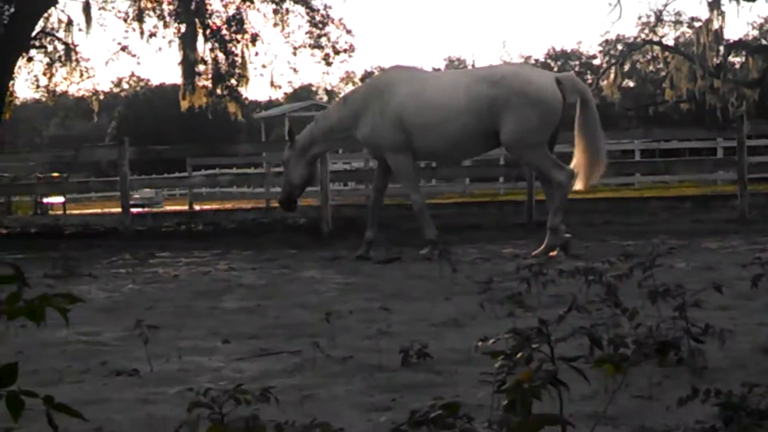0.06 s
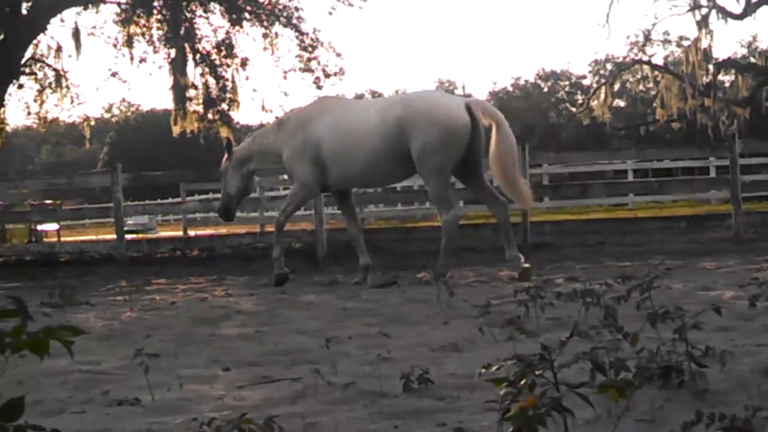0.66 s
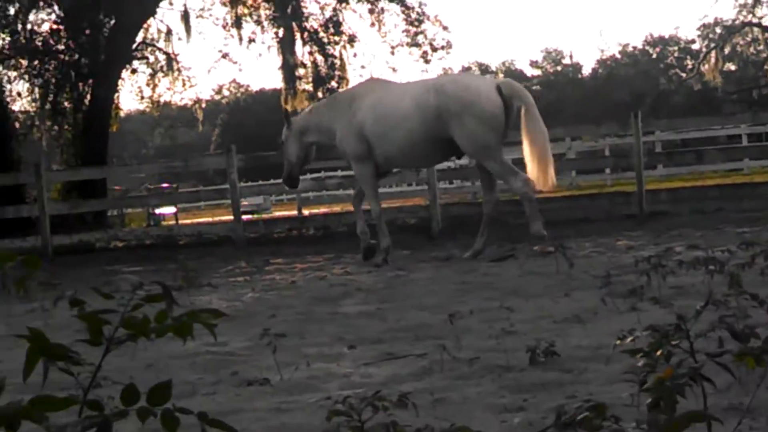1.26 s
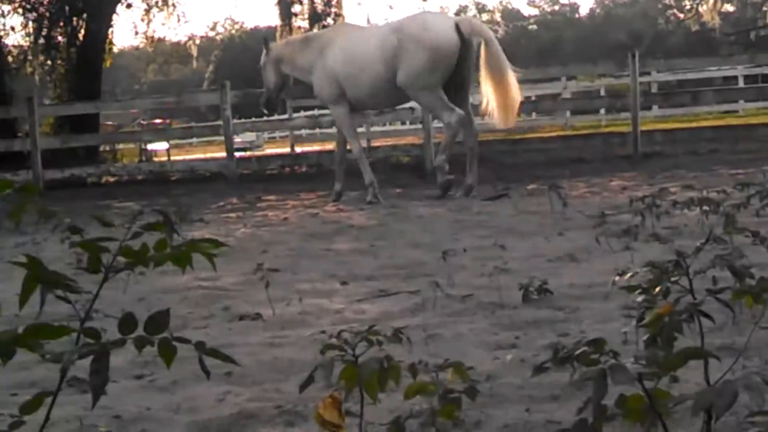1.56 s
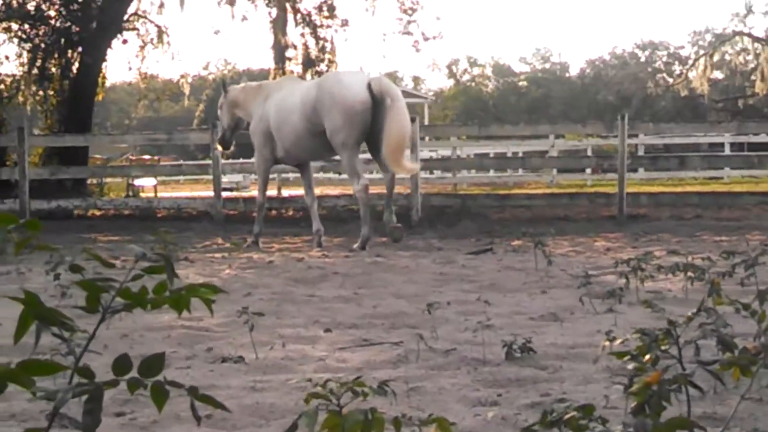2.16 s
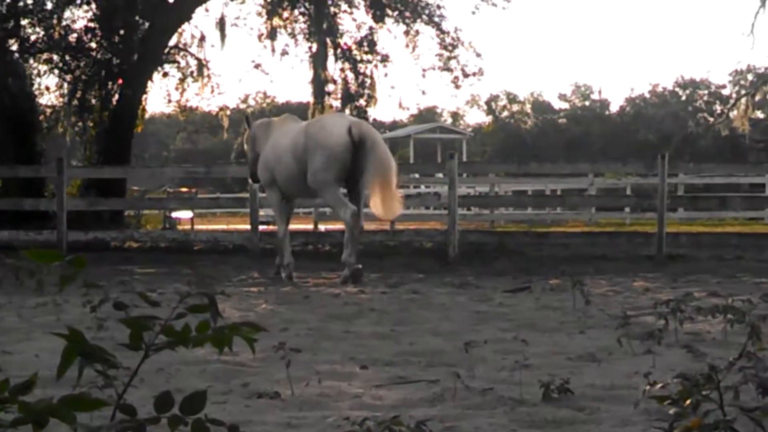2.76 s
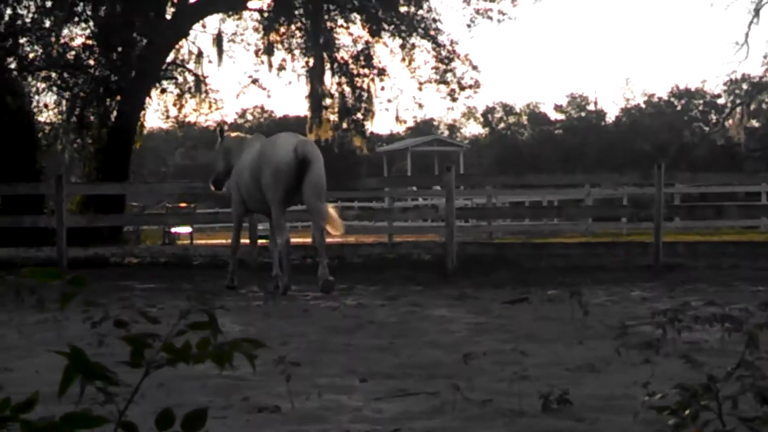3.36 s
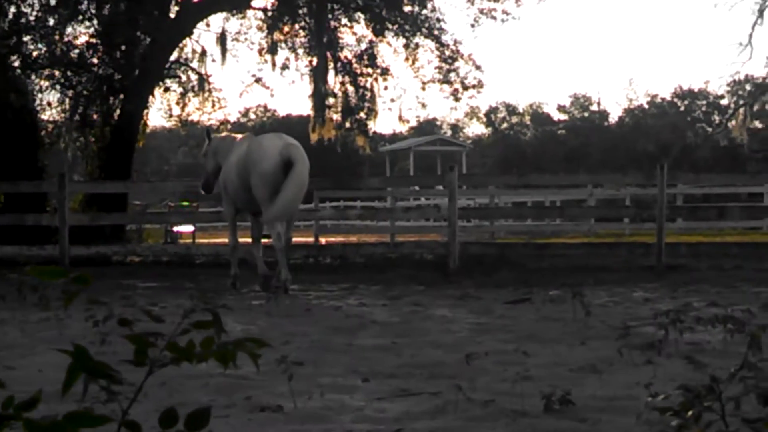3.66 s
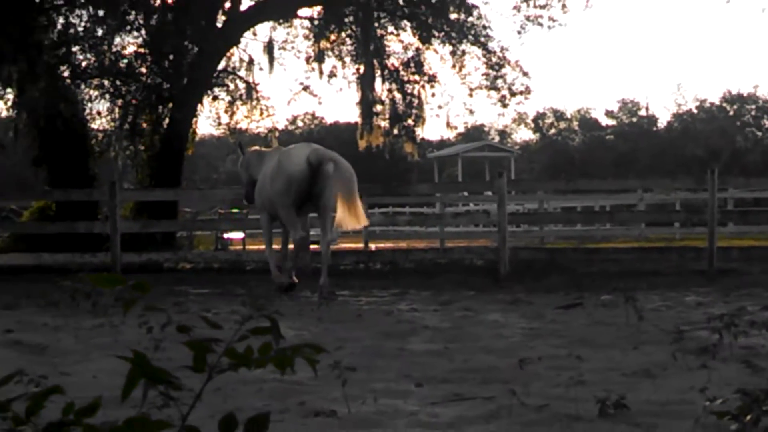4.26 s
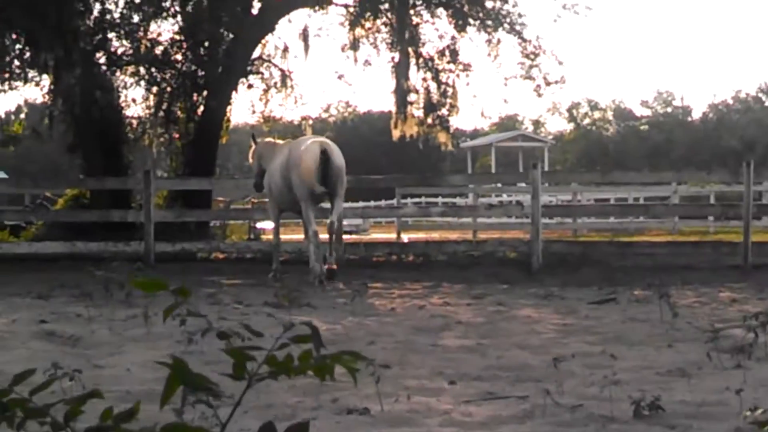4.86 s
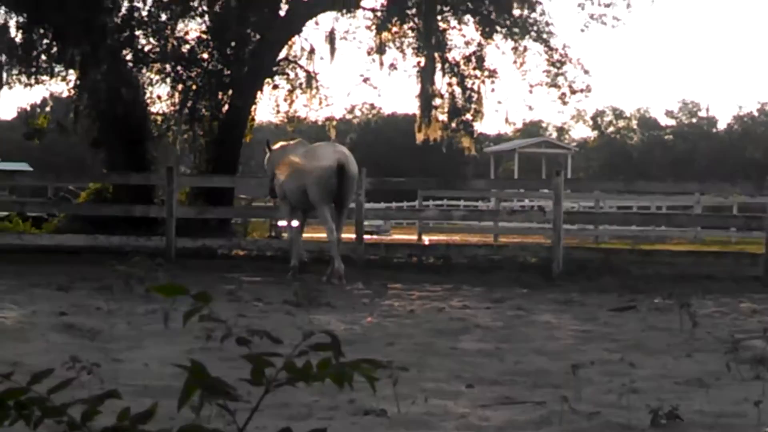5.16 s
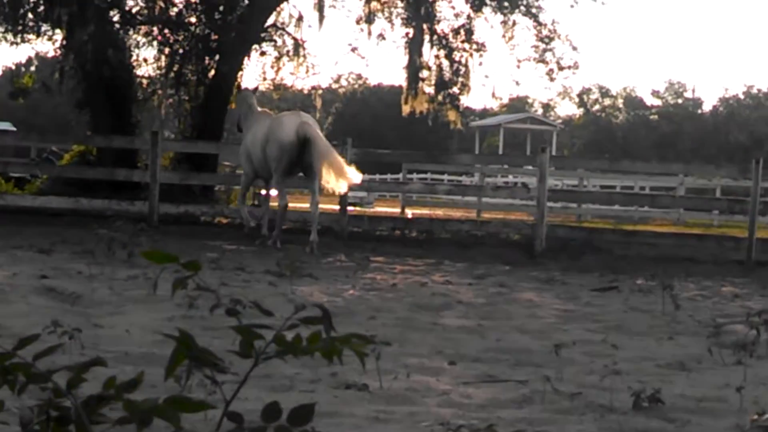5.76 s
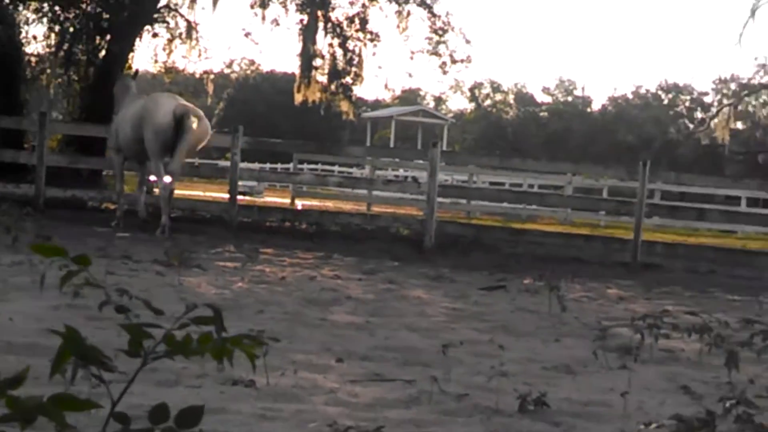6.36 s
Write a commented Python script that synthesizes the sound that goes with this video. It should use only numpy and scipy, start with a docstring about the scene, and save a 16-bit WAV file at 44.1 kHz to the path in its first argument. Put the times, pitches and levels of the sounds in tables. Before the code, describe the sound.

Beside a paddock at dusk, a near cricket chirps in a quick, even rhythm while others trill farther off, over a dull distant rush and faint hiss. Small birds whistle and chip among the trees, dry twigs snap close by, and a far knock echoes midway. Near the end leaves brush softly around the loudest snaps. The stereo sound is wide.

```python
"""Crickets at dusk beside a paddock, over a dull distant rush and a faint hiss: a near one chirps in short
bursts of wing strokes, another trills on, more ring far off. Dry twigs snap close by, among thin high
ticks and short swells of grainy high hiss. Small birds whistle and chip among the trees, soft taps sound,
a distant knock echoes and an insect buzzes once. Near the end leaves brush and a bird slurs hoarsely
downward. A camcorder's stereo widener spreads it all."""
import sys
import numpy as np
from scipy import signal
from scipy.fft import rfft, irfft
from scipy.io import wavfile
from scipy.ndimage import uniform_filter1d

SR = 44100
rng = np.random.default_rng(int(sys.argv[2]) if len(sys.argv) > 2 else 0)


def store_wav(level_fs):
    """Save 16-bit WAV to argv[1]."""
    pcm = np.round(np.clip(np.atleast_2d(level_fs), -1, 1) * 32767)
    wavfile.write(sys.argv[1], SR, pcm.T.astype(np.int16))


N = 286650
T = np.arange(N) / SR
F = np.maximum(np.arange(N // 2 + 1) * SR / N, 1)


def undb(db):
    """Decibels to gain."""
    return 10 ** (np.asarray(db) / 20)


def unit(x):
    """Scale to rms 1."""
    return x / np.sqrt(np.mean(x ** 2))


def over_pitch(rows):
    """Join (Hz, value) rows on a log-frequency axis."""
    hz, value = np.transpose(rows)
    return np.interp(np.log(F), np.log(hz), value)


def shape(x, gain):
    """Filter by a gain for each frequency."""
    return irfft(rfft(x) * gain, N)


def resonance(hz, width_hz):
    """Response of one damped resonance."""
    return 1 / (1 + 1j * (F / hz - hz / F) * hz / width_hz)


def noise_band(hz, width_hz, order):
    """Noise at rms 1 through a resonance; a higher order steepens the skirts."""
    return unit(shape(rng.standard_normal(N), resonance(hz, width_hz) ** order))


def drift(rate_hz):
    """Smooth random modulation with a spread of 1."""
    return unit(shape(rng.standard_normal(N), 1 / (1 + (F / rate_hz) ** 4)))


def phase_of(hz):
    """Running phase of a moving pitch."""
    return 2 * np.pi * np.cumsum(hz) / SR


def cycle_of(hz):
    """A ramp from 0 to 1 in each cycle of a moving rate."""
    return phase_of(hz) / (2 * np.pi) % 1


def arch(u):
    """A smooth swell while u runs from 0 to 1."""
    return np.sin(np.pi * np.clip(u, 0, 1))


def gate(start, end, fade_s):
    """Open from start to end, with a straight fade just inside each."""
    return np.clip(np.minimum(T - start, end - T) / fade_s, 0, 1)


def among_trees(x, wet_db, t60):
    """Direct sound at both capsules plus scatter from ground, trunks and leaves, at unchanged loudness."""
    scatter = rng.standard_normal((2, SR)) * undb(-60 * T[:SR] / t60)
    scatter /= np.sqrt(np.sum(scatter ** 2, axis=1, keepdims=True))
    heard = x + undb(wet_db) * signal.oaconvolve(np.atleast_2d(x), scatter, axes=1)[:, :N]
    return heard * x.std() / heard.std(axis=1, keepdims=True)


# The near cricket's chirps. Each row: middle in seconds, wing tone and overtone levels in relative dB.
CRICKET_CHIRPS = [(.075, -56, -71), (0.37, -56, -70), (0.678, -53.5, -68), (0.967, -54, -68),
                  (1.244, -54.5, -68.5), (1.538, -53.5, -66.5), (1.835, -54, -70), (2.134, -54.5, -70.5),
                  (2.398, -53.5, -74), (2.681, -53.5, -67), (2.976, -53, -67), (3.25, -55.5, -69),
                  (3.556, -55.5, -69), (3.86, -55.5, -69), (4.16, -54, -68), (4.464, -54.5, -70),
                  (4.759, -52.5, -69), (5.05, -51.5, -71), (5.372, -51, -72), (5.661, -52.5, -74),
                  (5.949, -52.5, -72), (6.235, -53, -74), (6.55, -54.5, -75)]


def chirping_cricket(count=7, rate_hz=38.5, duty=1.2, slip_s=.001506, opening_flat_hz=100,
                     low_hz=6574, high_hz=6874, low_droop_hz=70, high_droop_hz=110, wobble_hz=18):
    """Each wing closure drags the scraper over the file; both wings ring and sag as the stroke slows."""
    swell, stroke, flat_hz = np.zeros((2, N)), np.zeros(N), np.zeros(N)
    places = np.arange(count) - count // 2
    # a soft, flat opening stroke, firm ones that crest past the middle and a weak last one
    opening, closing = places == places[0], places == places[-1]
    effort_db = -.96 * (places / 2) ** 2 + .4 * places - 10 * opening - 14 * closing
    for middle, tone_db, overtone_db in CRICKET_CHIRPS:
        slips_db, lateness = rng.standard_normal((2, count))
        centres = middle + places / rate_hz + slip_s * lateness
        for centre, effort, first in zip(centres, effort_db + slips_db, opening):
            span = slice(*(max(int((centre + side / rate_hz) * SR), 0) for side in (-.6, .6)))
            stroke[span] = (T[span] - centre) * rate_hz / duty
            flat_hz[span] = opening_flat_hz * first
            gains = undb([[tone_db + effort], [overtone_db + 2 * effort]])
            swell[:, span] = np.maximum(swell[:, span], gains * arch(stroke[span] + .5))
    # the wings take a moment to ring up and down
    tone_swell, overtone_swell = uniform_filter1d(swell, size=192)
    low_phase = phase_of(low_hz - flat_hz - low_droop_hz * stroke + wobble_hz * drift(114.7))
    high_phase = phase_of(high_hz - flat_hz - high_droop_hz * stroke + wobble_hz * drift(102))
    rasp = noise_band(hz=6680, width_hz=400, order=3) / np.sqrt(2)  # from uneven teeth
    lower = tone_swell * undb(1.5) * np.sin(low_phase)
    upper = tone_swell * (undb(-2) * np.sin(high_phase) + undb(-2.5) * rasp)
    # the overtone sounds only at the height of a stroke
    overtone = undb(8) * overtone_swell * arch(stroke + .5) ** 2 * np.sin(2 * low_phase)
    # more of the upper tone arrives by scatter, so it swells later and lingers
    wings = among_trees(lower, wet_db=-7, t60=.08) + among_trees(upper, wet_db=0, t60=.085)
    wings = among_trees(wings, wet_db=-8.5, t60=.6)
    return np.sqrt(2) * (wings + among_trees(overtone, wet_db=-3, t60=.035))


def trill(hz, rate_hz, duty=.63, droop_hz=120, wobble_hz=30):
    """An unbroken run of wing strokes, each sagging in pitch."""
    stroke = cycle_of(rate_hz * (1 + .032 * drift(4.16))) / duty
    tone = np.sin(phase_of(hz - droop_hz * (stroke - .5) + wobble_hz * drift(267)))
    effort = undb(1.5 * drift(12))
    return unit(arch(stroke) * tone * effort)


# Bouts of trilling. Each row: start in seconds, length in seconds, relative level in dB.
BOUTS = [(-.1, 0.7, -63.5), (1.425, 0.87, -58), (2.048, 0.262, -63), (3.105, 1, -61), (5.187, 0.97, -60)]


def trilling_cricket(idle_db=-74, gain_db=-1.5):
    """A cricket in the grass nearby swells into each bout and idles softly between them."""
    effort = np.full(N, undb(idle_db))
    for start, length, db in BOUTS:
        effort = np.maximum(effort, undb(db) * gate(start, start + length, fade_s=.07))
    song = trill(hz=6560, rate_hz=38.5) * effort * undb(gain_db)
    return among_trees(song, wet_db=-6, t60=.15)


# The far chorus. Each row: one cricket's pitch in Hz, strokes per second, relative level in dB.
FAR_CRICKETS = [(6880, 43, -71), (6760, 35, -81), (6450, 33, -79)]


def far_crickets(gain_db=-2):
    """Distant trills waver in level and are blurred by scatter."""
    chorus = sum(trill(hz, rate) * undb(db + drift(2)) for hz, rate, db in FAR_CRICKETS)
    return undb(gain_db) * among_trees(chorus, wet_db=6, t60=.5)


# The tone colour of the rush. Each row: frequency in Hz, relative level in dB.
RUSH_SPECTRUM = [(15, -45), (25, -39.5), (75, 2), (118, 0), (167, 0), (391, -7), (441, -11), (659, -16),
                 (757, -20), (966, -24), (1600, -41.5), (2080, -55), (3520, -120)]
# Its stereo image. Each row: frequency in Hz, left minus right in dB, lead of the right side in
# radians, share common to both sides from 0 to 1.
RUSH_STEREO = [(38.4, -1, 0.98, 0.6), (75.3, 0, 2.19, 0.7), (122.6, -10.5, 1.54, 0.51),
               (238, -8, 1.33, 0.78), (360, -6.5, 0.077, 0.24), (776, -3, 1, 0.54), (1300, -12, 0.051, 0)]
# Its fader moves. Each row: time in seconds, rumble and roar levels in relative dB.
RUSH_SWELLS = [(0.0, -35.5, -48.5), (0.5, -34.0, -49.5), (0.699, -33.5, -48), (1.099, -35.5, -50.5),
               (1.3, -32, -49), (1.5, -37, -51), (2.4, -33.5, -48.5), (2.7, -37, -50.5), (4.1, -33, -49.5),
               (4.599, -35.5, -50), (5.2, -35, -49), (5.4, -36, -51.5), (5.7, -36, -49), (6.0, -37.5, -50),
               (6.5, -35.5, -47.5)]
# A moving bell EQ on the roar. Each row: time in seconds, boost or cut in dB.
ROAR_BELL = [(0, -1), (.6, -1), (.75, 4), (.9, 1), (1.25, 1.5), (1.55, -2), (1.93, 4.5), (2.1, 2.5),
             (2.28, 3), (2.65, 1), (2.95, -2.5), (3.4, 0), (3.8, -3.5), (4.1, 0), (4.7, -1), (5.15, 1),
             (5.95, -2.5), (6.4, 2)]


def distant_rush(split_hz=450, rumble_trim_db=-.7, bell_hz=660, bell_width_hz=190):
    """A dull, diffuse bed from far away; its low rumble and the roar above it swell separately."""
    image = np.array(RUSH_STEREO)
    pan_db, lead, share = (over_pitch(image[:, [0, k]]) for k in (1, 2, 3))
    common = rfft(rng.standard_normal(N)) * np.array([np.exp(-1j * lead), np.ones(len(F))])
    air = np.sqrt(share) * common + np.sqrt(1 - share) * rfft(rng.standard_normal((2, N)))
    air *= undb(over_pitch(RUSH_SPECTRUM) + np.array([pan_db, -pan_db]) / 2)
    lowpass = 1 / (1 + (F / split_hz) ** 8)
    rumble = unit(irfft(air * lowpass, N))
    roar = unit(irfft(air * (1 - lowpass), N))
    bell_band = shape(roar, np.exp(-((F - bell_hz) / bell_width_hz) ** 2))
    bell_db = np.interp(T, *np.transpose(ROAR_BELL))
    roar += bell_band * (undb(bell_db) - 1)
    times, rumble_db, roar_db = np.transpose(RUSH_SWELLS)
    rumble *= undb(np.interp(T, times, rumble_db) + rumble_trim_db)
    roar *= undb(np.interp(T, times, roar_db))
    return rumble + roar


# The noise floor. Each row: frequency in Hz, density in dB per Hz.
HISS_SPECTRUM = [(600, -110), (1500, -93.5), (2500, -95.5), (4000, -100), (5500, -103), (8000, -104),
                 (9500, -102.5), (11000, -107.5), (13000, -104), (15000, -102)]


def hiss():
    """Smooth hiss, unrelated at the two capsules."""
    return shape(rng.standard_normal((2, N)), undb(over_pitch(HISS_SPECTRUM)) * np.sqrt(SR / 2))


def ticks(rows, hz, width_hz, decay_s, build_s=.00025, size=2048):
    """For each (seconds, peak dB), a tiny crackle that builds up and dies, through one resonance."""
    out = np.zeros((2, N + 2 * size))
    age = (np.arange(size) - size // 2) / SR
    envelope = np.exp(np.minimum(age / build_s, -age / decay_s))
    ring = signal.iirpeak(hz, hz / width_hz, fs=SR)
    for time, db in rows:
        tick = signal.lfilter(*ring, rng.standard_normal((2, size)) * envelope)
        first = int(time * SR) + size // 2
        out[:, first:first + size] += undb(db) * tick / np.abs(tick).max()
    return out[:, size:size + N]


# Twigs breaking close by. Each row: time in seconds, crack and body peaks in relative dB.
TWIG_SNAPS = [(.303, -43, -49), (1.962, -41, -57), (1.984, -44, -57), (2.006, -38, -52), (2.028, -43, -57),
              (2.056, -58, -38), (2.379, -52, -39), (2.422, -41, -52), (2.831, -41, -60), (2.884, -41, -60),
              (2.927, -38, -50), (4.3225, -33, -32), (4.338, -35, -37), (6.333, -22.5, -26.5),
              (6.3367, -27, -36), (6.344, -22.5, -27), (6.356, -46, -45), (6.39, -33, -44),
              (6.4105, -32, -32), (6.431, -38, -52)]


def twig_snaps(faint_per_s=1.2, faint_db=-60, spread_db=3, gain_db=1):
    """Dry twigs break with a bright crack and a short woody body; fainter ones crack at random."""
    snaps = np.array(TWIG_SNAPS)
    faint = [(rng.uniform(0, N / SR), faint_db + spread_db * rng.standard_normal())
             for _ in range(int(faint_per_s * N / SR))]
    cracks = ticks([*snaps[:, [0, 1]], *faint], hz=14200, width_hz=4600, decay_s=.0005)
    bodies = ticks(snaps[:, [0, 2]], hz=2700, width_hz=5000, decay_s=.0012)
    return undb(gain_db) * among_trees(cracks + bodies, wet_db=-18, t60=.1)


# Swells of high hiss. Each row: middle in seconds, length in seconds, level in dB.
HIGH_HISS_SWELLS = [(.355, .08, -62), (1.02, .06, -58), (2.87, .16, -63), (6.325, .075, -52),
                    (6.41, .16, -62)]


def high_hiss_swells(hz=14600, width_hz=3500, grain_db=6):
    """Short swells of thin, grainy high hiss, the loudest around the last twig snaps."""
    grains = rng.standard_normal((2, N)) * undb(grain_db * drift(500))
    swell = sum(undb(db) * arch((T - middle) / length + .5) ** 2
                for middle, length, db in HIGH_HISS_SWELLS)
    return unit(shape(grains, resonance(hz, width_hz) ** 2)) * swell


# Thin high ticks. Each row: time in seconds, peak in dB, ring in Hz, bandwidth in Hz.
THIN_TICKS = [(.366, -45, 15000, 1500), (1.023, -43, 14700, 800), (2.379, -37, 15000, 800),
              (2.701, -38, 14800, 1000), (2.705, -38, 14800, 1000), (2.709, -39, 14800, 1000),
              (2.771, -37, 14550, 220), (6.06, -34, 14550, 400)]


def high_ticks():
    """Pings near the top of hearing, probably an insect, alone or in a quick run."""
    return sum(ticks([(time, db)], hz, width_hz, decay_s=.00096) for time, db, hz, width_hz in THIN_TICKS)


def bird_note(points, waver_hz):
    """A pure tone gliding through (seconds, Hz, dB) points, with a waver added to its pitch."""
    times, hz, db = np.transpose(points)
    envelope = gate(times[0], times[-1], fade_s=.012) * undb(np.interp(T, times, db))
    return np.sqrt(2) * envelope * np.sin(phase_of(np.interp(T, times, hz) + waver_hz))


# Three long falling whistles and a short rising one, a curve for each.
# Each point: time in seconds, pitch in Hz, relative level in dB.
WHISTLE_CURVES = [
    [(1.175, 3570, -59), (1.27, 3520, -56), (1.305, 3330, -64), (1.345, 3300, -59), (1.385, 3250, -61),
     (1.41, 3140, -65), (1.46, 3130, -60), (1.495, 3060, -66)],
    [(1.296, 2120, -63), (1.31, 2180, -68), (1.325, 2440, -71), (1.355, 2450, -67)],
    [(2.905, 3630, -68), (2.95, 3700, -62), (3.005, 3590, -58), (3.06, 3440, -67), (3.11, 3420, -62.5),
     (3.15, 3270, -65), (3.235, 3090, -62.5), (3.285, 2990, -65)],
    [(4.618, 3400, -63), (4.648, 3800, -63), (4.70, 3480, -64), (4.745, 3410, -62), (4.775, 3360, -67),
     (4.805, 3270, -58.5), (4.84, 3210, -66), (4.93, 3150, -61.5), (4.995, 3150, -62.5)],
]


def bird_whistles(waver_hz=32, flutter_db=2.5, gain_db=.5):
    """A farther bird whistles wavering, fluttering notes; the long ones slide slowly downward."""
    waver = waver_hz * drift(83)
    flutter = undb(gain_db + flutter_db * drift(16))
    song = flutter * sum(bird_note(points, waver) for points in WHISTLE_CURVES)
    # nearby trunks break the glide up; the deeper woods let it linger
    near = among_trees(song, wet_db=-1, t60=.1)
    return among_trees(near, wet_db=-2.5, t60=.8)


# A small bird's chips. Each row: start and length in seconds, starting and top pitch in Hz,
# rise time in seconds, level in dB, overtone in dB against the note.
BIRD_CHIPS = [(1.205, .035, 5300, 7560, .0095, -43, -24), (2.566, .031, 4900, 7260, .0036, -41.5, -13),
              (6.158, .028, 5600, 7750, .01, -49, -17)]


def bird_chips():
    """A thin note that shoots up and levels off; its top pitch rings on among the trees."""
    notes, overtones = np.zeros((2, N))
    for start, length, start_hz, top_hz, rise_s, db, overtone_db in BIRD_CHIPS:
        age = np.maximum(T - start, 0)
        phase = phase_of(top_hz + (start_hz - top_hz) * np.exp(-age / rise_s))
        swell = arch(age / length)
        notes += undb(db) * np.sqrt(2 * swell) * np.sin(phase)
        overtones += undb(db + overtone_db) * np.sqrt(2) * swell ** 2 * np.sin(2 * phase)
    return among_trees(notes, wet_db=-3, t60=.55) + among_trees(overtones, wet_db=-6, t60=.03)


# Soft taps. Each row: time in seconds, dry peak in dB, ring in Hz, bandwidth in Hz.
SOFT_TAPS = [(1.301, -45, 2150, 220), (2.378, -47, 3780, 220), (3.041, -41, 1170, 260),
             (4.89, -47, 1700, 500)]


def soft_taps():
    """Small dull taps from further off, each with one short resonance."""
    taps = sum(ticks([(time, db)], hz, width_hz, decay_s=.0049) for time, db, hz, width_hz in SOFT_TAPS)
    return among_trees(taps, wet_db=-8, t60=.3)


# A knock and its two echoes. Each row: start in seconds, ring level in relative dB, centre and
# bandwidth in Hz, decay in seconds, hard edge level in relative dB.
KNOCK_AND_ECHOES = [(3.342, -46, 1000, 600, .048, -51), (3.45, -46, 1080, 320, .08, -63),
                    (3.67, -54.5, 1080, 220, .15, -72)]


def far_knock(onset_s=.009):
    """A distant knock with a hard edge, smeared by the woods, comes back twice, duller each time."""
    knocks = np.zeros(N)
    for start, db, hz, width_hz, decay_s, edge_db in KNOCK_AND_ECHOES:
        age = np.maximum(T - start, 0)
        ring = undb(db) * noise_band(hz, width_hz, order=2)
        edge = undb(edge_db) * noise_band(hz=2600, width_hz=1000, order=2)
        knocks += (ring + edge) * (1 - np.exp(-age / onset_s)) * np.exp(-age / decay_s)
    return among_trees(knocks, wet_db=-7, t60=.6)


def insect_buzz(middle_s=4.66, length_s=.62, rate_hz=95, level_db=-67):
    """A small insect further off buzzes once: a fast-pulsing rasp pitched above the crickets."""
    strokes = arch(cycle_of(rate_hz * (1 + .05 * drift(20))))
    rasp = unit(noise_band(hz=7550, width_hz=600, order=3) * strokes)
    swell = arch((T - middle_s) / length_s + .5)
    return among_trees(undb(level_db) * rasp * swell, wet_db=0, t60=.3)


def leaves(start_s=5.95, attack_s=.39, decay_s=.56, level_db=-57.5, grain_db=4):
    """Leaves brush with a soft, grainy sound that swells up to the loudest snaps and fades."""
    grains = rng.standard_normal((2, N)) * undb(grain_db * drift(170))
    rustle = unit(shape(grains, resonance(hz=2200, width_hz=3000)))
    age = T - start_s
    swell = np.clip(age / attack_s, 0, 1) * np.exp(-np.maximum(age - attack_s, 0) / decay_s)
    return undb(level_db) * rustle * swell


# A bird's downward slur. Each row: time in seconds, pitch in Hz, relative level in dB.
SLUR_CURVE = [(6.085, 5200, -62), (6.125, 4450, -63), (6.16, 3950, -67), (6.19, 3560, -63),
              (6.225, 3500, -60), (6.29, 3200, -66)]


def bird_slur(rough_hz=380, gain_db=-2.5):
    """A hoarse note that drops steeply and clears as it bottoms out."""
    start, end = SLUR_CURVE[0][0], SLUR_CURVE[-1][0]
    hoarseness = np.interp(T, [start, end], [rough_hz, 0]) * drift(400)
    note = undb(gain_db) * bird_note(SLUR_CURVE, hoarseness)
    return among_trees(note, wet_db=-2, t60=.8)


def scene():
    """Everything that reaches the two capsules."""
    insects = chirping_cricket() + trilling_cricket() + far_crickets() + insect_buzz() + high_ticks()
    birds = bird_chips() + bird_whistles() + bird_slur()
    woods = far_knock() + twig_snaps() + soft_taps() + leaves()
    return insects + birds + woods + high_hiss_swells() + distant_rush() + hiss()


def record(dry, widen_from_hz=900, lag_samples=15.85, top_hz=15500):
    """Above the bass the widener subtracts a delayed copy of the opposite capsule; then the top is cut."""
    capsules = rfft(dry) * undb([[-.5], [.5]])  # the right capsule is a little hotter
    crossfeed = 1 / (1 + (widen_from_hz / F) ** 4)
    delay = np.exp(-2j * np.pi * F * lag_samples / SR)
    wide = (capsules - crossfeed * delay * capsules[::-1]) / np.hypot(1, crossfeed)
    high_cut = signal.ellip(10, .2, 70, top_hz, fs=SR, output="sos")
    return signal.sosfilt(high_cut, irfft(wide, N))


dry = scene()
out = record(dry)
store_wav(out)
```